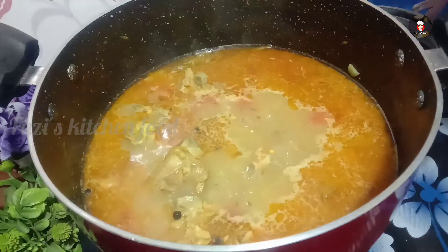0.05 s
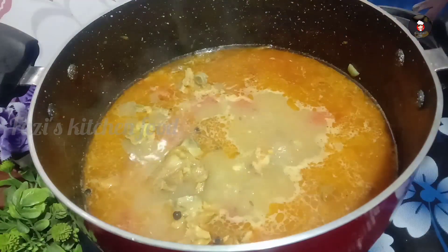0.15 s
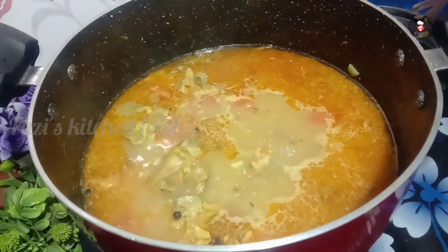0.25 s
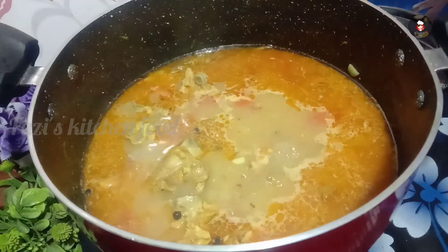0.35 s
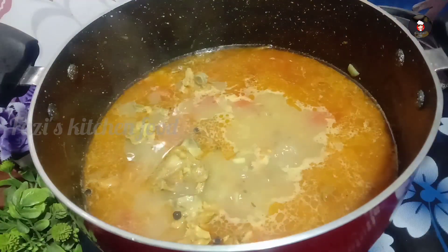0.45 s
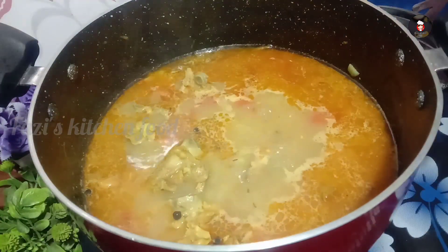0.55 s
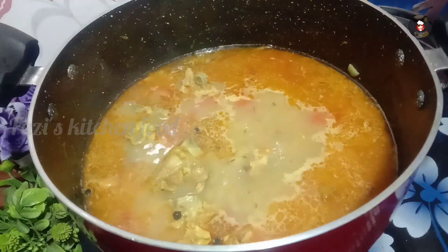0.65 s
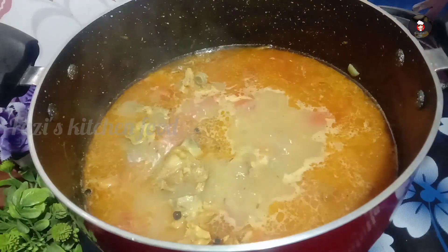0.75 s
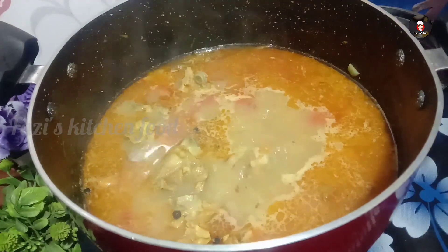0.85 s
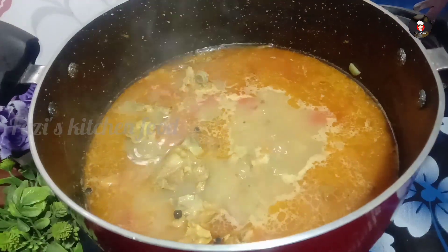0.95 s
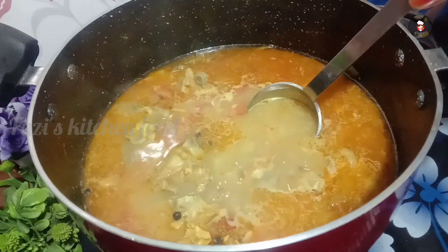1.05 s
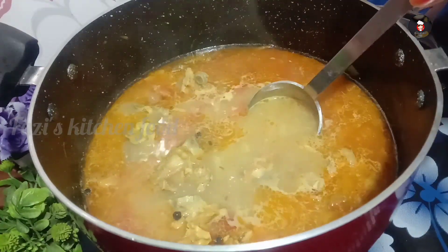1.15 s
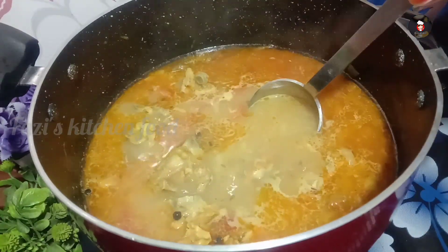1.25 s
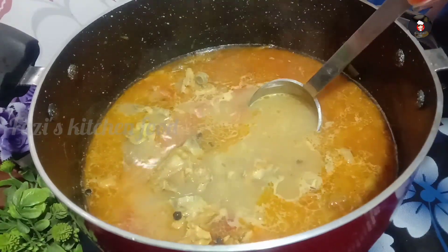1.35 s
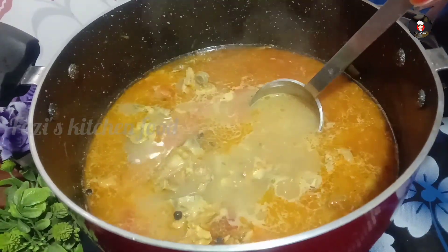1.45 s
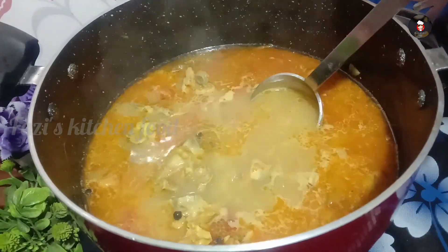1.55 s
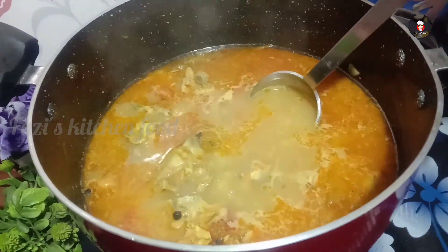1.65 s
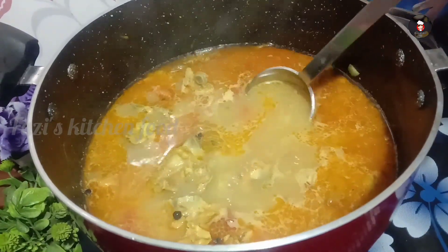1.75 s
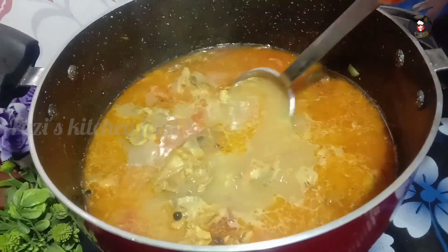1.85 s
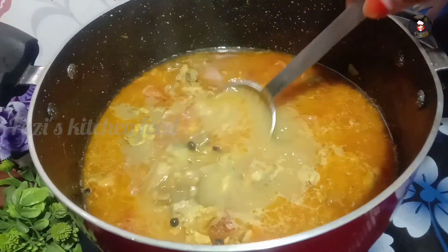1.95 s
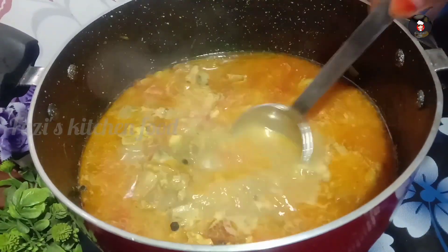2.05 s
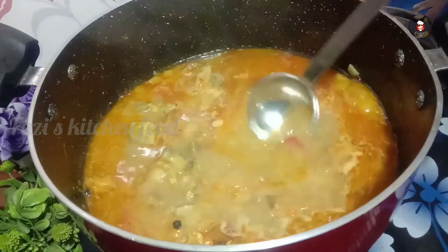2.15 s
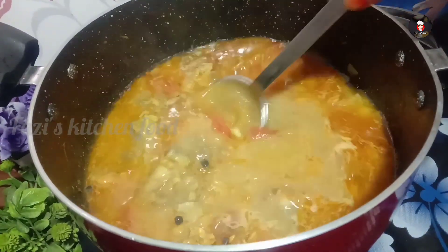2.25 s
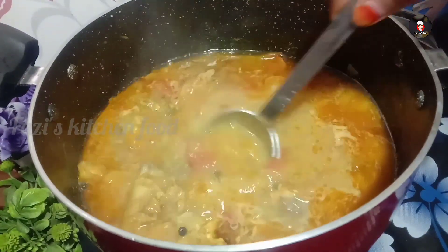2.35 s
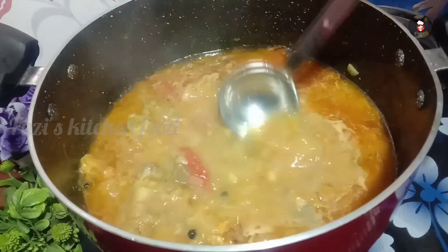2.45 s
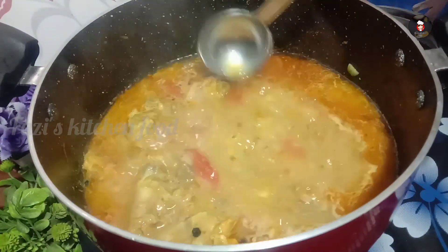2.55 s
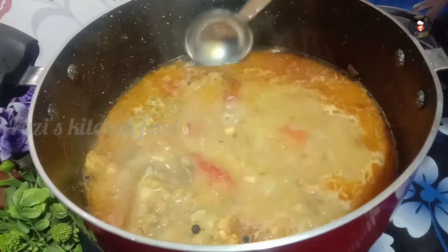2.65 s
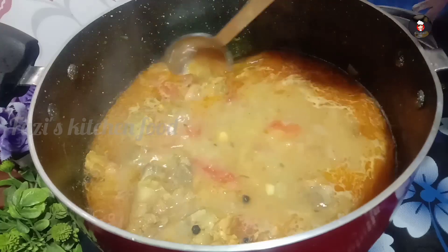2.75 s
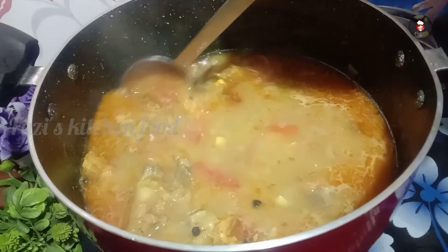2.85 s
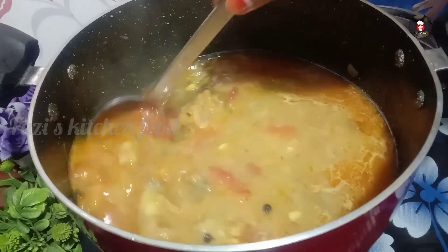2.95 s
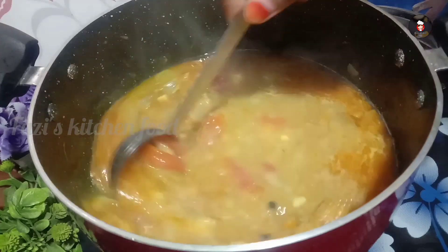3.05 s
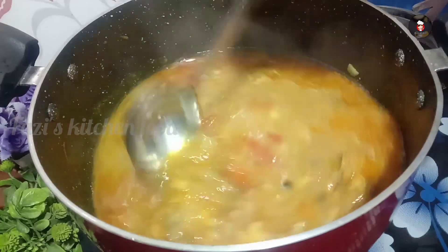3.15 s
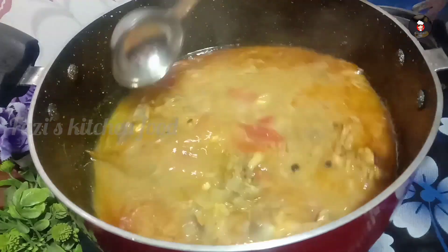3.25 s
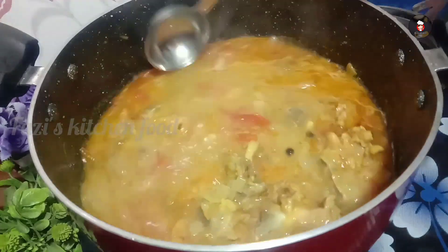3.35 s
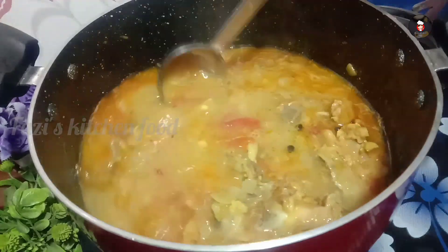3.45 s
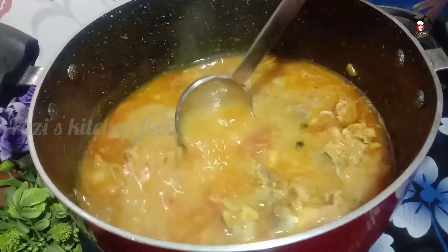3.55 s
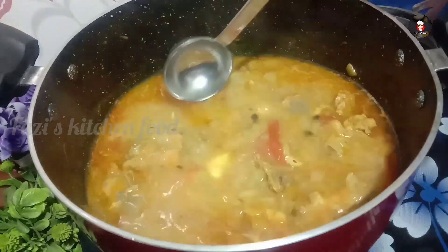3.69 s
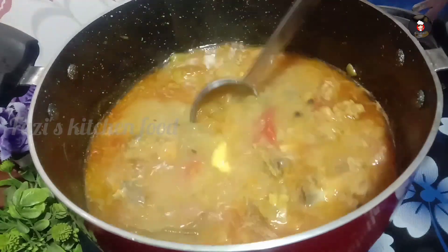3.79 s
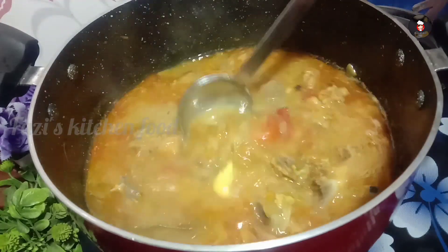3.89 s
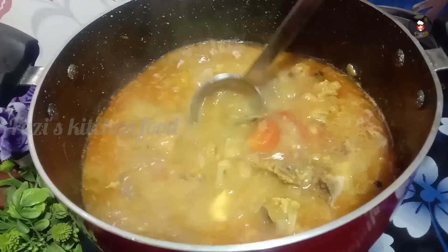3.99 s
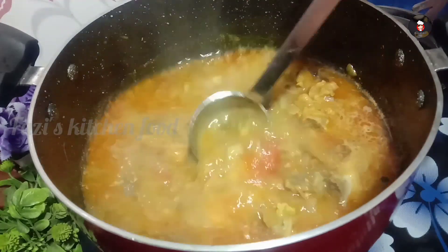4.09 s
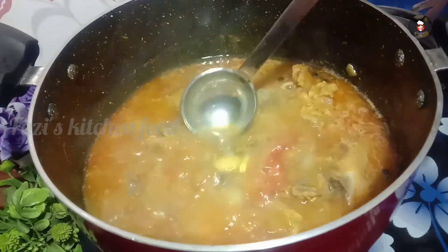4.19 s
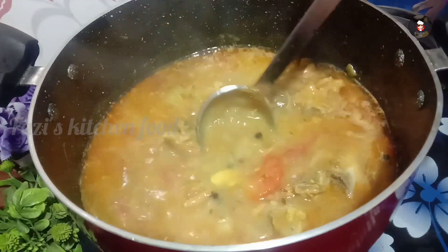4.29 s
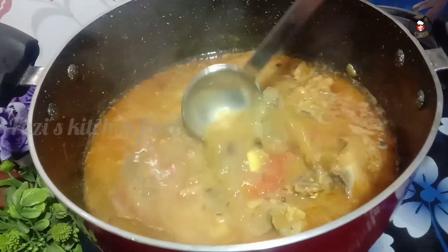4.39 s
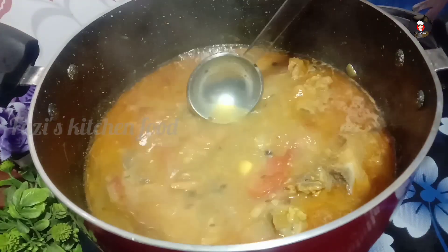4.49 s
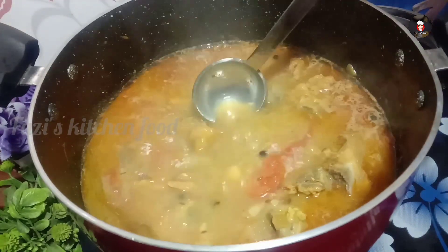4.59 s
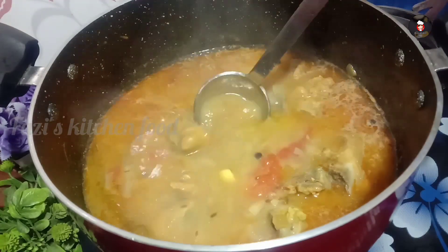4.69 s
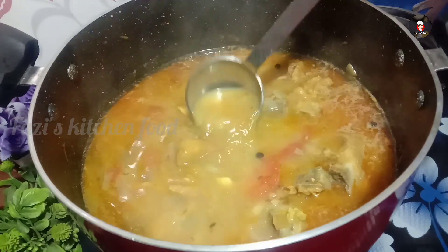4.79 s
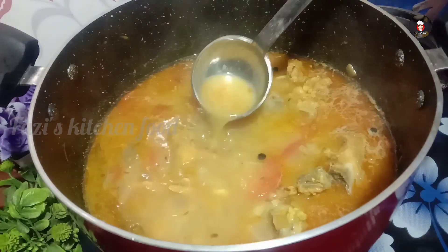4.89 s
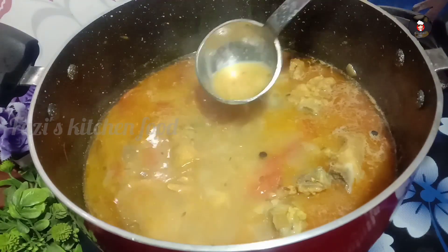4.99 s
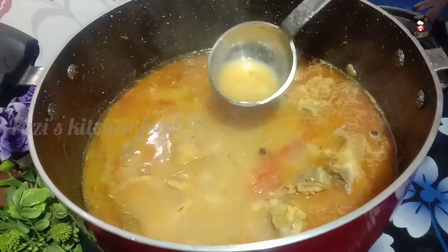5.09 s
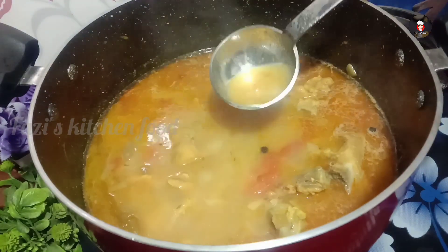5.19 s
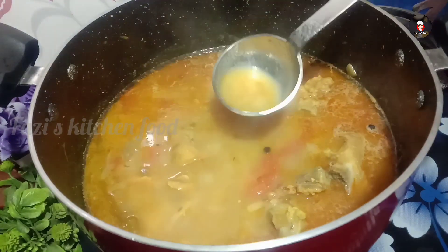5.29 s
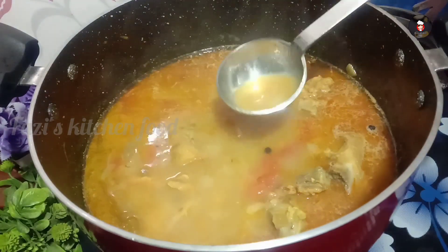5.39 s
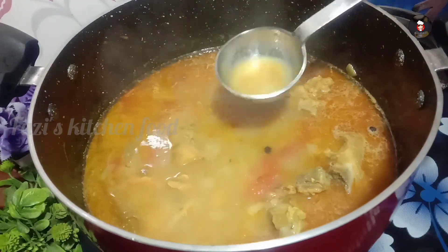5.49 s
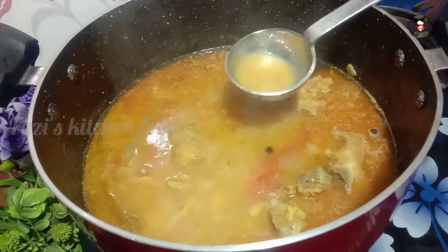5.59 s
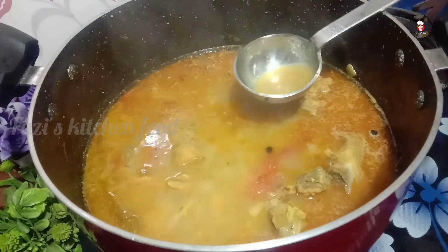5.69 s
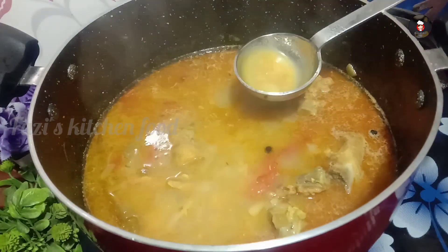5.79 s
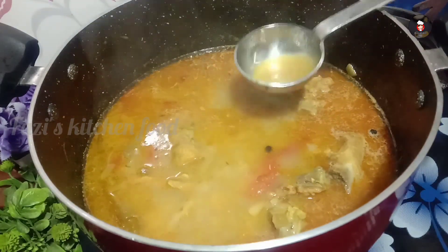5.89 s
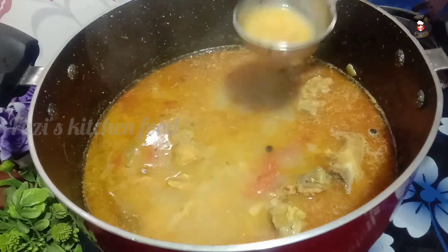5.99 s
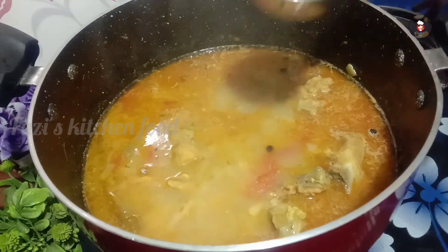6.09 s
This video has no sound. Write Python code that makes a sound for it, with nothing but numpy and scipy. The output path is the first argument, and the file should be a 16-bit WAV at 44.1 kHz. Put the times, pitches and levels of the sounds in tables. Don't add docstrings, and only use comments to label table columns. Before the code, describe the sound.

A close, nearly mono kitchen sound with little reverberation. Throughout, a gas burner hisses softly, slowly weakening, with a faint breathy whistle, low rumble and tiny simmering bubbles. In the first second the flame briefly sings a thin, gliding tone; there is a faint scratch near 0.6 s and a light touch at 1.0. Soft gulps follow as the ladle enters the soup. At 2.1-2.3 s come dull submerged knocks and a brighter tap. At 2.52 s the steel ladle strikes the pot loudly, bouncing, scraping and ringing for a few tenths of a second. Light scrapes lead to a crisp double clang at 3.27, a small knock at 3.63 and a short, hard, heavily damped knock at 3.73. From 4 to 5.5 s it calms to drips, sloshing and low gulps. A lighter, quick double clink rattles at 5.65, then soft settling and a faint tap at 6.1.

```python
import sys
import numpy as np
from scipy import signal
from scipy.fft import rfft, irfft, next_fast_len
from scipy.io import wavfile
from scipy.ndimage import uniform_filter1d, map_coordinates

SR = 44100
rng = np.random.default_rng(int(sys.argv[2]) if len(sys.argv) > 2 else 0)


def ratio_of_db(decibels):
    return 10 ** (np.asarray(decibels, float) / 20)


def wav_record(signal):
    frames = np.transpose(np.atleast_2d(signal))
    bounded = np.clip(frames, -1, 1)
    quanta = np.round(bounded * 32767).astype(np.int16)
    wavfile.write(sys.argv[1], SR, quanta)


N = 270577

# frequency in Hz, level in dB per Hz.
RUMBLE_COLOUR = [(13, -38), (22, -36), (32, -28.5), (54, 0.5), (97, -10), (140, -19), (180, -12),
                 (310, -120)]
SIMMER_COLOUR = [(59, -34), (100, -7), (182, -17), (214, -6.5), (248, -11.5), (340, -5), (1020, -15),
                 (1250, -11), (1500, -15), (1950, -39.5), (3300, -120)]
GAS_COLOUR = [(820, -43), (1400, -15), (1820, -6.5), (1970, -7), (2490, -10), (3580, -12.5), (3840, -11),
              (4330, -13.5), (5040, -10), (6620, -9.5), (6820, -3.5), (7470, -6), (9330, -18),
              (13400, -26.5), (15600, -16.5)]
# frequency in Hz, width in Hz, lift in dB.
POT_HUM = [(149, 59, 11.5), (208.4, 10, 9), (330.6, 47, 5.5), (439, 9.9, 7), (686, 40, 4)]
BURNER_JETS = [(4950, 450, 1), (6150, 180, 9.5), (7158, 170, 11.5), (7610, 360, 11), (8470, 20, 15)]
# time in seconds, gas hiss in dB.
FLAME = [(0.0, -61.5), (1.09, -62), (1.37, -63.5), (1.57, -63.5), (1.98, -64.5), (3.02, -65.5),
         (3.21, -64.5), (3.6, -64.5), (5.02, -65), (6.13, -68.5)]
# start in seconds, length in seconds, dB over the rumble.
SHUDDERS = [(.55, 0.12, 4), (.98, 0.17, 12.5), (1.1, 0.41, 9.5), (1.5, 0.5, 11), (2.5, .2, 16),
            (3.26, 0.26, 6), (3.62, 0.23, 4)]
# start in seconds, length in seconds, dB over the simmer.
STIRRING = [(1.7, 0.29, 2.5), (2.1, 0.28, 10), (2.55, 0.13, 24), (3.3, 0.28, 6.5), (3.9, 0.26, 4),
            (5.0, 0.11, 4.5)]
# start in seconds, length in seconds, change in dB.
WHISTLE_SWELLS = [(0, 0.31, -6.5), (1.0, 0.62, -3.5), (1.5, 0.28, 4), (2.0, 0.33, -5), (4.4, 0.65, 0.5),
                  (5.3, 0.25, 3.5), (5.75, .22, 5), (6.0, 0.2, 6.5)]
# time in seconds, pitch in Hz, level in dB.
SQUEAL = [(0.12, 1180, -85), (0.2, 1152, -65), (0.312, 1214, -71), (0.371, 1206, -62), (0.479, 1291, -59),
          (0.66, 1293, -60), (0.75, 1270, -65), (0.901, 1287, -76)]

# start in seconds, level in dB, lowest Hz, highest Hz, t60 in seconds.
KNOCKS = [(0.571, -55.5, 3480, 7100, 0.41), (.595, -53, 3220, 8100, 0.48),
          (1.003, -45.5, 1500, 7100, 0.083), (2.119, -44, 540, 970, 0.03), (2.127, -42, 330, 900, 0.2),
          (2.17, -51, 400, 1400, .2), (2.229, -49, 299.4, 1000, .12), (2.275, -47, 301, 1460, .15),
          (5.66, -40, 580, 740, 0.09), (2.157, -52.5, 2030, 3300, 0.12), (2.201, -47.5, 2730, 3440, 0.18),
          (2.2145, -45, 1950, 2410, 0.07), (2.215, -37, 3280, 6450, 0.045),
          (2.221, -44.5, 970, 1400, 0.092), (2.247, -42, 6400, 8050, 0.045), (2.254, -34, 458, 2250, 0.075),
          (2.256, -34.5, 5430, 7830, 0.047), (2.26, -46, 2700, 11900, 0.05), (2.125, -60, 4670, 5400, 0.13),
          (2.168, -62, 5600, 6500, .06), (2.28, -56, 5500, 6400, 0.065), (2.32, -63, 1500, 7500, 0.084),
          (3.001, -57, 5750, 6940, 0.19), (3.018, -52.5, 5800, 7540, 0.21),
          (3.141, -50.5, 1200, 9300, 0.092), (3.185, -52.5, 623, 1200, 0.12), (3.336, -43, 400, 1290, 0.18),
          (3.3, -46, 2180, 3630, 0.22), (3.6265, -37, 600, 2000, 0.05), (3.634, -40, 300, 1000, 0.07),
          (3.627, -50, 2480, 3300, 0.09), (3.954, -43.5, 640, 1030, 0.08), (3.961, -56, 504, 1840, 0.29),
          (3.779, -56.5, 1500, 2300, 0.27), (3.769, -58, 2920, 3970, 0.27), (6.097, -59, 398, 2220, 0.15)]
# start in seconds, level in dB, lowest Hz, highest Hz.
DRIPS = [(0.727, -52, 6650, 8200), (2.223, -50.5, 6330, 15300), (2.4017, -50, 4040, 10400),
         (2.939, -54, 2480, 4000), (3.5495, -49, 2900, 9000), (3.582, -54, 5950, 7800),
         (3.809, -56, 2700, 7000), (3.834, -58.5, 2820, 4530), (4.059, -49.5, 2390, 8300),
         (4.152, -59.5, 2770, 5330), (4.351, -55, 2600, 7000), (4.85, -63, 2970, 5050)]
# start in seconds, level in dB, pitch in Hz, t60 in seconds.
GULPS = [(1.164, -56.5, 850, 0.053), (1.33, -60, 1570, 0.1), (1.501, -59.5, 1750, 0.65),
         (1.58, -57.5, 1720, 0.38), (1.839, -51.5, 885, 0.079), (1.849, -57, 1630, 0.37),
         (2.885, -51, 438, 0.24), (4.48, -64, 1840, 0.37), (5.046, -50, 368, 0.2), (5.17, -55, 707, 0.27),
         (5.269, -49.5, 350, 0.26), (5.519, -47, 340, 0.19), (5.685, -47, 151, 0.18),
         (5.96, -58, 492, 0.089)]
# start in seconds, level in dB.
ROCKING = [(1.004, -57), (1.327, -52), (1.84, -56), (2.258, -48), (3.627, -43), (3.835, -50), (4.151, -57),
           (4.85, -60), (6.097, -58)]
# level in dB, t60 in seconds.
STAND_HZ = [154, 322]
STAND_MODES = [(12.5, 0.12), (2.5, 0.11)]
# start in seconds, peak in dB, pitch in Hz, t60 in seconds.
TICKS = [(0.7265, -35, 7500, .015), (2.1187, -40, 900, .025), (2.1238, -29, 820, .025),
         (2.1308, -33, 620, .025), (2.2143, -32, 4900, .015), (2.258, -27, 6200, .025),
         (2.2595, -33, 800, .04), (2.402, -44, 5200, .012), (2.4025, -46, 7400, .012),
         (3.5492, -37, 7200, .015), (3.5492, -45, 3400, .03), (3.5825, -39, 7200, .012),
         (3.6266, -25, 1500, .018), (3.6313, -27, 850, .02), (3.7312, -13, 900, .018),
         (3.955, -41, 900, .02)]
# start in seconds, length in seconds, level in dB, pitch in Hz, loss in dB over the length.
BLOOMS = [(2.523, 0.055, -32, 248, 7.5), (2.535, 0.31, -29, 335, 21), (2.53, .13, -34, 1435, 0),
          (2.62, .16, -33, 1435, 34), (2.535, .14, -35, 968, 14), (2.53, .14, -26, 153, 24),
          (3.268, .19, -28, 1988, 35), (2.539, 0.11, -47, 4990, 27.5), (2.543, 0.097, -44, 4225, 20.5),
          (2.586, 0.043, -48, 6000, 10), (2.75, 0.054, -44, 152, 4), (3.733, 0.065, -40, 335, 3),
          (3.785, 0.125, -47, 334, -6), (5.665, 0.07, -46, 332, -6), (5.73, 0.105, -48, 339, 4),
          (5.82, 0.13, -51, 339, 0), (3.285, .23, -35.5, 1441, 25), (3.625, .08, -33, 170, 13),
          (3.725, .075, -31, 165, 8), (2.4, 0.084, -60, 4986, 14), (2.59, 0.073, -47, 2300, 14),
          (2.3, 0.056, -55, 6272, 14), (2.56, .09, -46.5, 1330, 12), (5.965, 0.069, -53.5, 300, 3)]

FAR_HZ = [153, 335, 388, 581, 682, 968, 1091, 1255, 1434, 1601, 1988, 2141, 2591, 2703, 3155, 3598, 4029,
          4150, 4986, 5926, 6111, 6272, 6492, 7009, 7211, 7974]
LEFT_HZ = [161, 177, 394, 425, 678, 964, 1096, 1441, 1616, 1988, 2153, 2594, 2688, 3165, 4796, 4235, 4458,
           4968, 5010, 6974, 6128, 7242, 2215, 2735, 3335]
BOTTOM_HZ = [156, 333, 490, 679, 880, 1250, 1600, 2017, 2930, 4570, 5932, 7029, 400, 1080, 1780, 3620]
HANDLE_HZ = [146, 330, 406, 573, 675, 1590, 2009, 2183, 2720, 2830, 3130, 3630, 4288, 5085, 5535, 5815,
             6074, 6255, 6915, 8441, 9063, 11117]
# level in dB, t60 in seconds.
FAR_MODES = [(-12, 0.073), (-30, 0.14), (-18, 0.31), (-8.5, 0.056), (-2, 0.075), (-28, 0.1), (-9, 0.12),
             (-10.5, 0.086), (-34, 0.1), (-9, 0.12), (-2, 0.14), (-14, 0.14), (-21.5, 0.058), (-25, 0.096),
             (-35, 0.22), (-55, 0.19), (-35.5, 0.21), (-22, 0.1), (-17, 0.092), (-41, 0.16), (-39.5, 0.25),
             (-41.5, 0.14), (-35, 0.13), (-35, 0.14), (-29, 0.18), (-38, 0.26)]
LEFT_MODES = [(-2, 0.29), (-5, 0.41), (-10, 0.87), (-0.5, 0.036), (-8, 0.2), (-16.5, 0.48), (8, 0.11),
              (-30, 0.2), (-2, 0.074), (-24, 0.1), (-9.5, 0.13), (3, 0.15), (-8, 0.047), (-13.5, 0.15),
              (-4.5, 0.035), (-3.5, 0.069), (-8, 0.06), (-13, 0.15), (-3, 0.0494), (-2, 0.05), (2, 0.045),
              (-2.5, 0.04), (0.5, .05), (7.5, 0.031), (-1.5, 0.045)]
BOTTOM_MODES = [(-8, 0.08), (0, 0.05), (0, 0.04), (-1.5, 0.05), (2, 0.025), (5.5, 0.023), (0, 0.02),
                (-7.5, 0.035), (-7, 0.025), (-4, 0.016), (-14, 0.04), (-21, 0.04), (-6, 0.06), (-3, 0.023),
                (0.5, 0.017), (-15, 0.031)]
HANDLE_MODES = [(-47, 0.31), (-16, .08), (-15.5, 0.17), (-36, 0.1), (-16, 0.046), (2.5, 0.039),
                (-13, 0.051), (-18, 0.05), (-6, 0.052), (4, 0.029), (-4, 0.023), (-4, 0.027), (-17, 0.056),
                (6, 0.031), (-7, 0.035), (6, 0.03), (-26, 0.06), (-1.5, 0.046), (-0.5, 0.042),
                (-8.5, 0.048), (-12, 0.048), (-19, 0.033)]
# frequency in Hz, level in dB per Hz.
CRASH_FAR = [(88, -26), (150, -13.5), (837, -10), (968, -18), (1100, -4), (1255, 0), (1435, -16),
             (1600, -4), (1760, -24), (2060, -2), (2270, -4.5), (4320, -11), (5360, -11), (6140, -5.5),
             (16000, -34.5)]
CRASH_LEFT = [(88, -53), (150, -21), (422, -2), (854, -8.5), (1100, 0), (1210, -9.5), (1620, -3),
              (1990, -14), (2360, -1.5), (2650, -4.5), (5360, -5), (6140, 4.5), (16000, -27)]
CRASH_BOTTOM = [(88, -49), (150, -14), (260, -27), (340, -5.5), (540, -5.5), (850, -2), (2060, -10),
                (2450, -18), (3700, -8.5), (5910, -7.5), (6390, -24), (7040, -9), (8400, -19.5),
                (16000, -44)]
CRASH_HANDLE = [(88, -73), (150, -15), (637, -13.5), (1060, -12), (1600, -4), (3620, 0), (4300, -19),
                (6020, 0.5), (7920, -8.5), (11000, -1.5), (13400, -12), (15100, -3), (16000, -38)]
# start in seconds, ring in dB, crash in dB, crash t60 in seconds.
BLOW_FAR = [
    (2.523, -26, -11.5, 0.055),
    (2.534, -36, -21, 0.051),
    (2.545, -48, -28, 0.038),
    (2.556, -41, -32.5, 0.2),
    (2.575, -59, -34.5, 0.051),
    (2.585, -51, -34, 0.037),
    (2.592, -34.5, -32, 0.046),
    (2.598, -29, -35.5, 0.021),
    (2.62, -49, -42, 0.038),
]
BLOW_LEFT = [
    (3.2665, -29, -17.5, 0.021),
    (3.2705, -28, -17.5, 0.036),
    (3.285, -53, -45, 0.29),
]
BLOW_BOTTOM = [
    (3.7253, -22.5, -15, 0.022),
    (3.7312, -29.5, -20, 0.016),
    (3.738, -45, -30.5, 0.015),
]
BLOW_HANDLE = [
    (5.6535, -33, -22, 0.018),
    (5.6565, -30, -21.5, 0.021),
    (5.6605, -37.5, -28.5, 0.025),
    (5.678, -44, -43, 0.08),
    (5.701, -52, -46, 0.04),
    (5.705, -53, -48, 0.065),
]

# frequency in Hz, t60 in seconds.
KITCHEN = [(200, 0.3), (2000, 0.074), (10000, 0.046)]
# frequency in Hz, gain in dB.
MICROPHONE = [(8000, -2), (10500, -6), (12800, -8), (15000, -3), (16500, -8)]
# frequency in Hz, level in dB per Hz.
DIFFERENCE_COLOUR = [(30, -12), (300, -11.0), (3000, -17.5), (5500, -17.5), (8000, -28.5), (12000, -29),
                     (15000, -22.0), (15500, -19.5), (15800, -51.0)]

STEADY_TOP_HZ = 15720
RUMBLE_DB, SIMMER_DB, SIMMER_SWELL_DB = -69, -62.5, 2
WHISTLE_HZ, WHISTLE_DRIFT_HZ = 1251, 16
WHISTLE_DB, WHISTLE_FLICKER_DB = -2, 3.5
DRIP_T60 = 0.063
GULP_WIDTH = 0.059
TAP_HOLD_S, CRASH_HOLD_S = 0.0075, 0.0023
TAP_WALL = 0.11
TICK_RISE_CYCLES = 0.3
BLOOM_RISE_S, BLOOM_FALL_S, BLOOM_DRIFT_HZ, BLOOM_FLICKER_DB = 0.041, 0.022, 3, 0.9
BLOW_S = 0.36
FREE_UNTIL, FREE_GAIN = 2.584, 4.6
SWAY_LAG = 3
PAIR_DEPTH, CHATTER_DB = 0.33, 2.8
CRASH_VALLEY = 0.36
TREBLE_HZ, TREBLE_SHARE = 9000, 0.68


def unit(x):
    return x / np.sqrt(np.mean(x ** 2) + 1e-20)


def along(points, hz):
    f, v = np.transpose(points)
    return np.interp(np.log(hz + 1), np.log(f + 1), v)


def curves(rows):
    s, *cols = np.transpose(rows)
    return [np.interp(np.arange(N) / SR, s, c) for c in cols]


def wobble(rate):
    knots = rng.standard_normal(int(N * rate / SR) + 4)
    return map_coordinates(knots, [np.arange(N) * rate / SR])


def swells(rows):
    total = np.zeros(N)
    for s, length, db in rows:
        progress = np.clip((np.arange(N) / SR - s) / length, 0, 1)
        total += db * np.sin(np.pi * progress ** 0.77)
    return total


def filtered(x, response):
    m = next_fast_len(x.shape[-1] + 8192)
    spectrum = rfft(x, m) * response(np.fft.rfftfreq(m, 1 / SR))
    return irfft(spectrum, m)[..., :x.shape[-1]]


def peak(f, hz, width):
    return 1j * f * width / (hz * hz - f * f + 1j * f * width)


def add(out, s, x):
    part = out[round(s * SR):][:len(x)]
    part += x[:len(part)]


def rush(colour, peaks, streak_db):
    z = signal.stft(rng.standard_normal(N), nperseg=1024)[2]
    field = uniform_filter1d(rng.standard_normal(z.shape), size=2, axis=0)
    field = uniform_filter1d(field, size=7, axis=1)
    reach = np.linspace(1.15, 0.15, len(z))[:, None]
    x = signal.istft(z * ratio_of_db(streak_db * reach * unit(field)), nperseg=1024)[1][:N]

    def response(f):
        lift = sum(db * np.abs(peak(f, hz, width)) ** 2 for hz, width, db in peaks)
        return ratio_of_db(along(colour, f) + lift)

    return unit(filtered(x, response))


def room_rumble():
    level_db = RUMBLE_DB + swells(SHUDDERS) + 2.1 * wobble(6.3)
    return ratio_of_db(level_db) * rush(RUMBLE_COLOUR, [], streak_db=4.0)


def simmering():
    level_db = SIMMER_DB + swells(STIRRING) + SIMMER_SWELL_DB * wobble(8.8)
    return ratio_of_db(level_db) * rush(SIMMER_COLOUR, POT_HUM, streak_db=2.5)


def gas_hiss(flame_db):
    return ratio_of_db(flame_db + 3 + 0.5 * wobble(40)) * rush(GAS_COLOUR, BURNER_JETS, streak_db=5.0)


def flame_whistle(flame_db):
    slow = filtered(rng.standard_normal((2, N)), lambda f: 1 / (1 + (f / 30) ** 2))
    turn = 2 * np.pi * np.cumsum(WHISTLE_HZ + WHISTLE_DRIFT_HZ * wobble(4)) / SR
    level_db = flame_db + WHISTLE_DB + swells(WHISTLE_SWELLS) + WHISTLE_FLICKER_DB * wobble(22)
    return ratio_of_db(level_db) * unit(slow[0] * np.cos(turn) + slow[1] * np.sin(turn))


def flame_squeal():
    silent_start, silent_end = (0, SQUEAL[0][1], -99), (0.97, SQUEAL[-1][1], -99)
    hz, db = curves([silent_start, *SQUEAL, silent_end])
    turn = 2 * np.pi * np.cumsum(hz + 6 * wobble(30)) / SR
    return ratio_of_db(db + 5.0 + 0.85 * wobble(31)) * np.sin(turn)


def stove():
    flame_db, = curves(FLAME)
    return room_rumble() + simmering() + gas_hiss(flame_db) + flame_whistle(flame_db) + flame_squeal()


def bubbles(count=200):
    out, t = np.zeros(N), np.arange(SR // 6) / SR
    for when, pitch, size in rng.random((count, 3)):
        hz = 300 * 7.5 ** pitch
        life = 0.014 + 3.7 / hz
        shape = (t / life) * np.exp(1 - t / life)
        tone = np.sin(2 * np.pi * hz * t * (1 + 0.0065 * t / life))
        level_db = -69.0 - 2.5 * np.log(size + 0.024) - 8 * pitch
        add(out, when * N / SR, ratio_of_db(level_db) * tone * shape)
    return out


def wall(f, modes_hz=FAR_HZ, valley=0.45):
    return valley + sum(np.abs(peak(f, hz, 60 + 0.02 * hz)) ** 2 for hz in modes_hz)


def port_ring(f):
    return np.abs(peak(f, 14700, 898)) ** 2


def ring(hz, modes, t, start, phase, cycles):
    hz, phase = np.array(hz)[:, None], phase[:, None]
    db, t60 = np.transpose(modes)[:, :, None]
    free = np.minimum(t, FREE_UNTIL - start) if 2.5 < start < FREE_UNTIL else 0
    worn = t - free * (1 - 1 / FREE_GAIN)
    longest = np.where(hz > 2800, 0.2, 0.9)
    build_up = 1 - np.exp(-t * hz / (cycles * np.where(hz < 360, SWAY_LAG, 1)))
    fade = ratio_of_db(db - 60 * worn / np.clip(t60, 0.02, longest)) * build_up
    split = PAIR_DEPTH * ((hz > 450) & (hz < 1300) | (hz > 2650))
    beat = 1 + split * np.sin(2 * np.pi * (9 + 3.2 * phase) * (t + start))
    knots = rng.standard_normal((len(hz), 64))
    spot = np.broadcast_arrays(np.arange(len(hz))[:, None], t * 90)
    rough = (hz > 400) & (hz < 1900) | (hz > 2100)
    chatter = ratio_of_db(CHATTER_DB * map_coordinates(knots, spot, order=1) * rough)
    tone = np.sin(2 * np.pi * hz * (t + start) + phase)
    return (fade * beat * chatter * tone).sum(0)


def tap_noise(low_hz, high_hz, length):
    steep = 16 / np.clip(np.log(high_hz / low_hz), 0.2, 1)

    def edge(ratio):
        return 1 + np.minimum(ratio, 50) ** steep

    def response(f):
        colour = TAP_WALL * wall(f) + 1 - TAP_WALL
        band = colour / (edge(low_hz / (f + 1)) * edge(f / high_hz))
        return band + ratio_of_db(-3.5) * port_ring(f) * (high_hz > 8500)

    return unit(filtered(rng.standard_normal(length), response))


def taps():
    out, t = np.zeros(N), np.arange(SR // 3) / SR
    drips = [(*row, DRIP_T60) for row in DRIPS]
    gulps = [(s, db, hz * (1 - GULP_WIDTH), hz * (1 + GULP_WIDTH), t60) for s, db, hz, t60 in GULPS]
    for s, db, low_hz, high_hz, t60 in KNOCKS + drips + gulps:
        fade = ratio_of_db(-3 - 60 * np.maximum(t - TAP_HOLD_S, 0) / t60)
        shape = fade * (1 - np.exp(-t * low_hz / 0.27))
        add(out, s, ratio_of_db(db + 1.0) * tap_noise(low_hz, high_hz, len(t)) * shape)
    for s, db in ROCKING:
        phase = 2 * np.pi * rng.random(len(STAND_MODES))
        add(out, s, ratio_of_db(db) * ring(STAND_HZ, STAND_MODES, t, s, phase, cycles=0.3))
    return out


def ticks():
    out, t = np.zeros(N), np.arange(SR // 20) / SR
    for s, db, hz, t60 in TICKS:
        rise = 1 - np.exp(-t * hz / TICK_RISE_CYCLES)
        add(out, s, ratio_of_db(db - 60 * t / t60) * rise * np.sin(2 * np.pi * hz * t))
    return out


def blooms():
    out, drift, flicker = np.zeros(N), np.cumsum(wobble(25)) / SR, wobble(30)
    for s, length, db, hz, loss_db in BLOOMS:
        t = np.arange(round(length * SR)) / SR
        here = slice(round(s * SR), round(s * SR) + len(t))
        ramp = np.minimum(t / BLOOM_RISE_S, (length - t) / BLOOM_FALL_S)
        edges = np.sin(np.pi / 2 * np.clip(ramp, 0, 1))
        turn = 2 * np.pi * (hz * (s + t) + BLOOM_DRIFT_HZ * drift[here])
        level_db = db - loss_db * t / length + BLOOM_FLICKER_DB * flicker[here]
        add(out, s, ratio_of_db(level_db) * edges * np.sin(turn))
    return out


def crash(colour, hz, t, t60):
    def response(f):
        return ratio_of_db(along(colour, f)) * wall(f, hz, CRASH_VALLEY) + ratio_of_db(-36.5) * port_ring(f)

    noise = unit(filtered(rng.standard_normal(len(t)), response))
    low = filtered(noise, lambda f: 1 / (1 + (f / 1500) ** 2))
    high = filtered(noise, lambda f: 1 / (1 + (TREBLE_HZ / (f + 1)) ** 8))
    after = np.maximum(t - CRASH_HOLD_S, 0)
    sound = low * ratio_of_db(-60 * after / (1.4 * t60))
    sound += (noise - low - high) * ratio_of_db(-60 * after / t60)
    sound += high * ratio_of_db(-60 * after / (TREBLE_SHARE * t60))
    return sound * (1 - np.exp(-t / 0.0002))


def blows():
    out, t = np.zeros(N), np.arange(round(BLOW_S * SR)) / SR
    hits = [(BLOW_FAR, FAR_HZ, FAR_MODES, CRASH_FAR),
            (BLOW_LEFT, LEFT_HZ, LEFT_MODES, CRASH_LEFT),
            (BLOW_BOTTOM, BOTTOM_HZ, BOTTOM_MODES, CRASH_BOTTOM),
            (BLOW_HANDLE, HANDLE_HZ, HANDLE_MODES, CRASH_HANDLE)]
    for contacts, hz, modes, colour in hits:
        phase = 2 * np.pi * rng.random(len(modes))
        for s, ring_db, crash_db, t60 in contacts:
            add(out, s, ratio_of_db(crash_db) * crash(colour, hz, t, t60))
            add(out, s, ratio_of_db(ring_db) * ring(hz, modes, t, s, phase, cycles=0.96))
    return out


def kitchen(x):
    hz, t, z = signal.stft(rng.standard_normal(SR // 3), SR, nperseg=256)
    fade = ratio_of_db(-60 * t / along(KITCHEN, hz)[:, None])
    tail = signal.istft(z * fade, SR, nperseg=256)[1]
    delayed = np.pad(x, (300, 0))
    return signal.fftconvolve(delayed, tail / np.linalg.norm(tail))[:N]


def microphone(x):
    return filtered(x, lambda f: (1j * f / (75 + 1j * f)) ** 4 * ratio_of_db(along(MICROPHONE, f)))


def scene():
    steady = filtered(stove() + bubbles(), lambda f: f < STEADY_TOP_HZ)
    contacts = taps() + ticks() + blows()
    steel = microphone(contacts + ratio_of_db(-14) * kitchen(contacts) + blooms())
    mono = steel + steady
    apart = ratio_of_db(-76.0) * rush(DIFFERENCE_COLOUR, [], streak_db=5.0)
    apart = apart + ratio_of_db(-18) * filtered(steel, lambda f: 1j * port_ring(f))
    return np.array([mono + apart, mono - apart])


def top_cut(x):
    return signal.sosfilt(signal.butter(12, 16650, fs=SR, output="sos"), x)


def record(dry):
    mix = filtered(dry, lambda f: f < 16620)
    return top_cut(mix)


dry = scene()
out = record(dry)
wav_record(out)
```